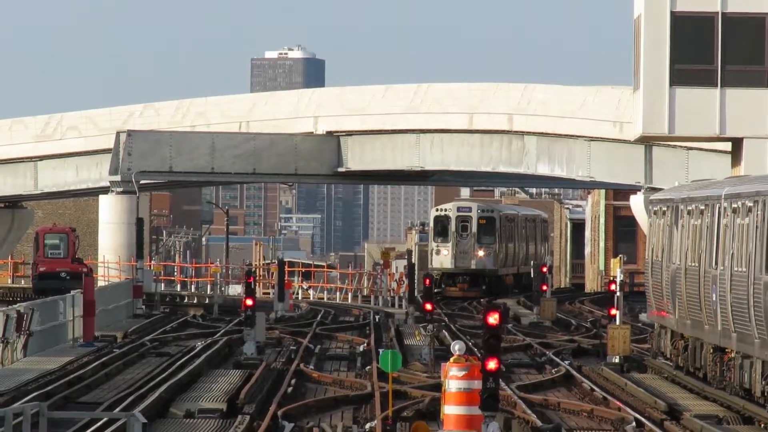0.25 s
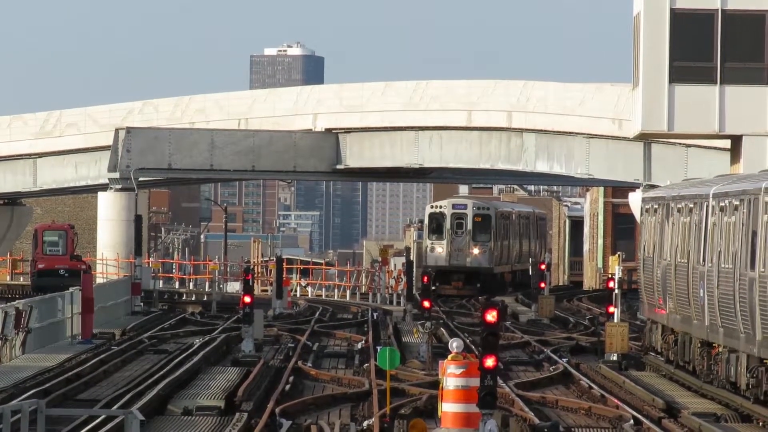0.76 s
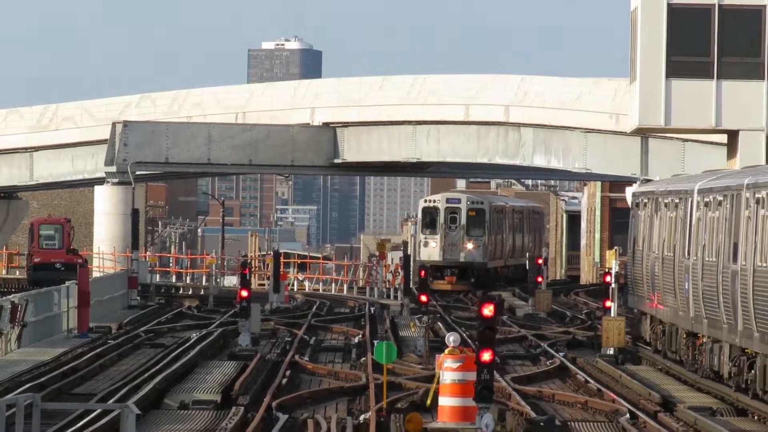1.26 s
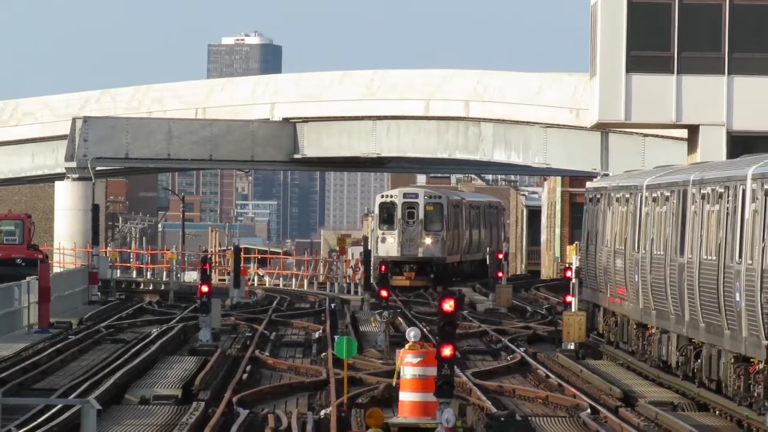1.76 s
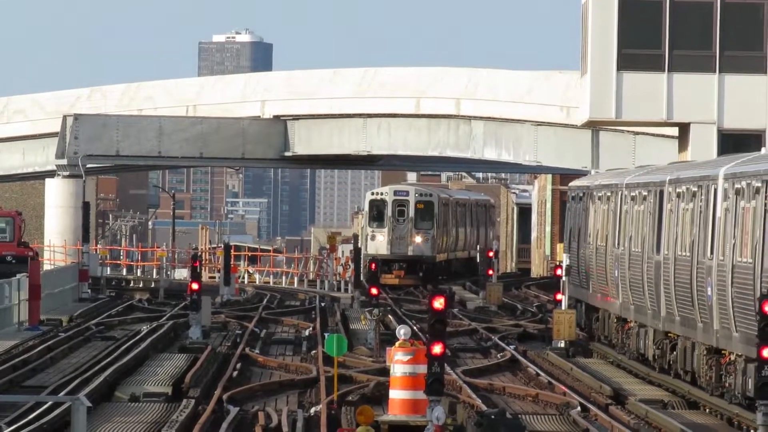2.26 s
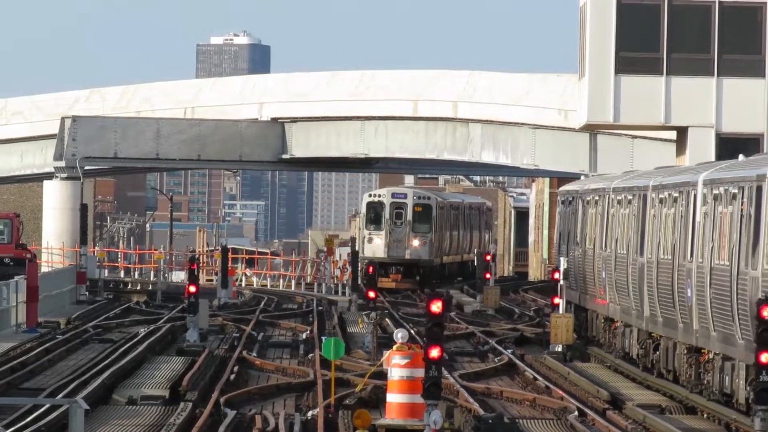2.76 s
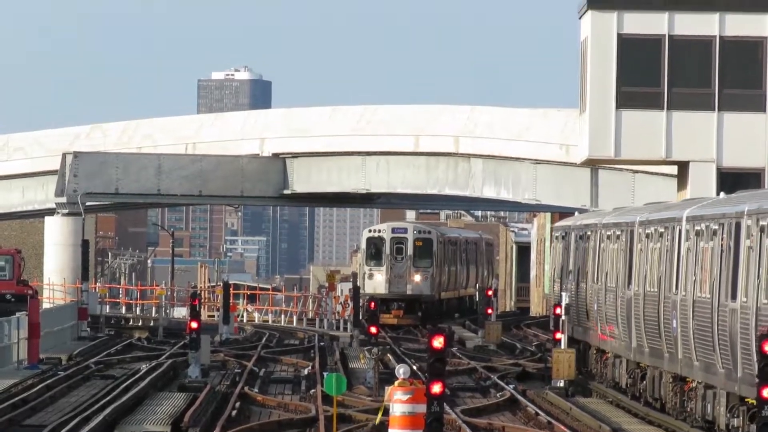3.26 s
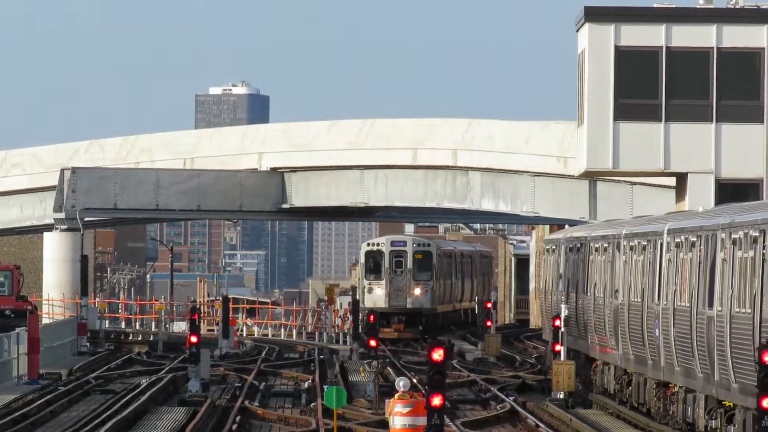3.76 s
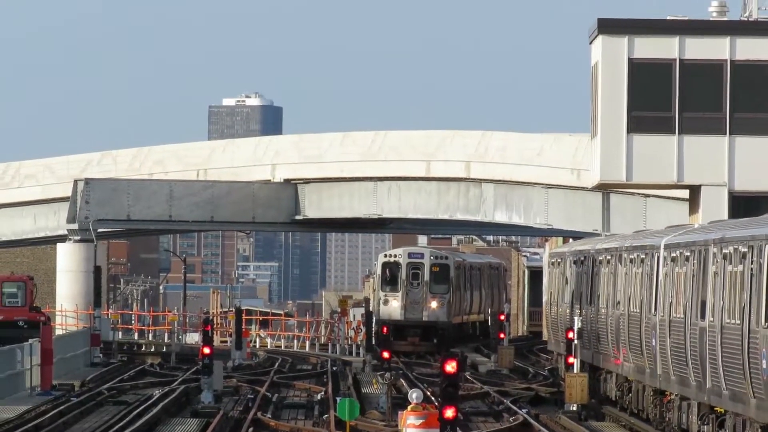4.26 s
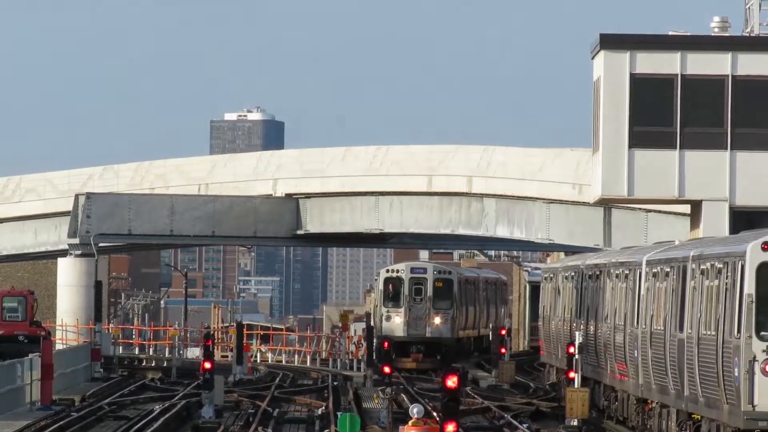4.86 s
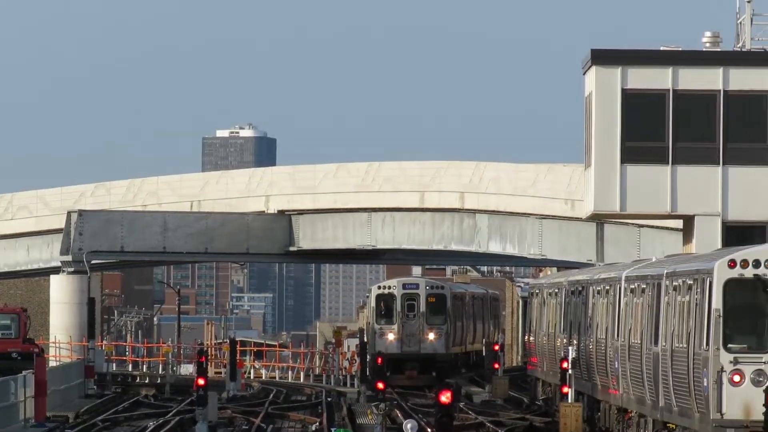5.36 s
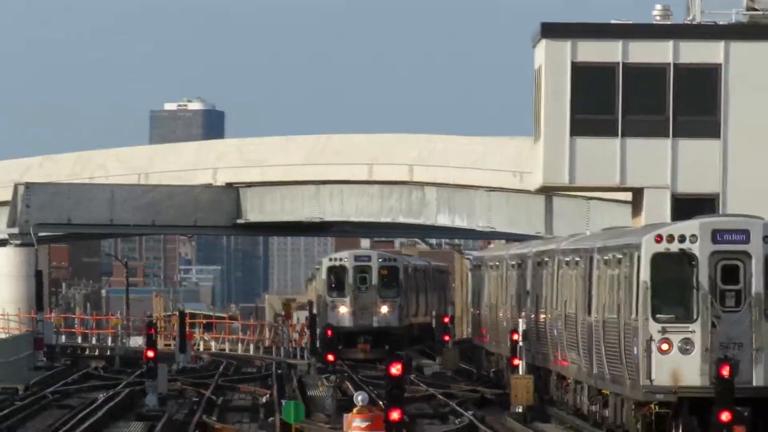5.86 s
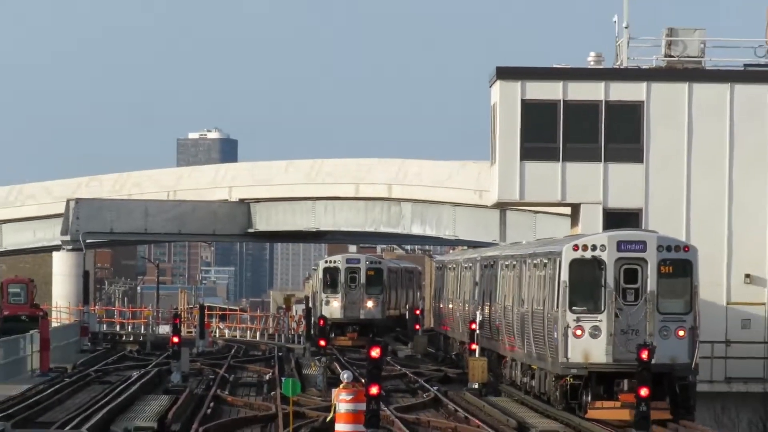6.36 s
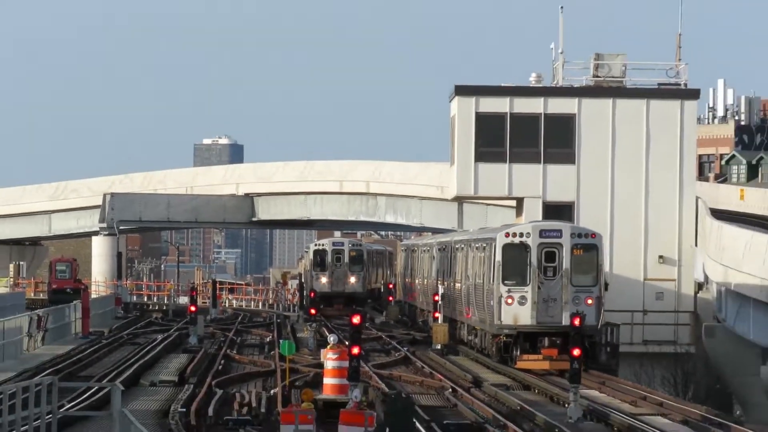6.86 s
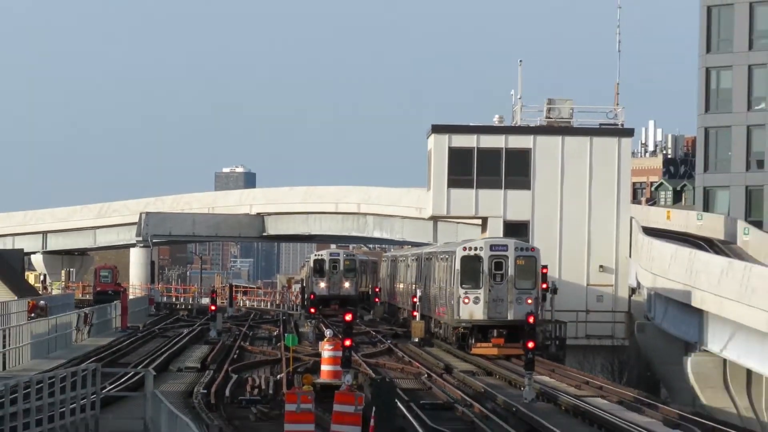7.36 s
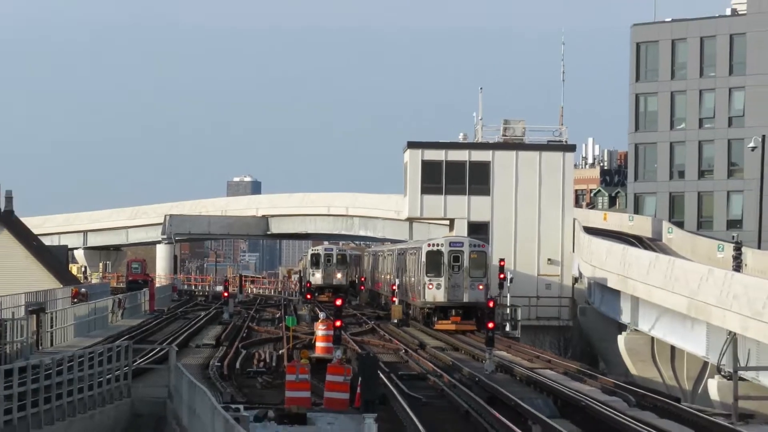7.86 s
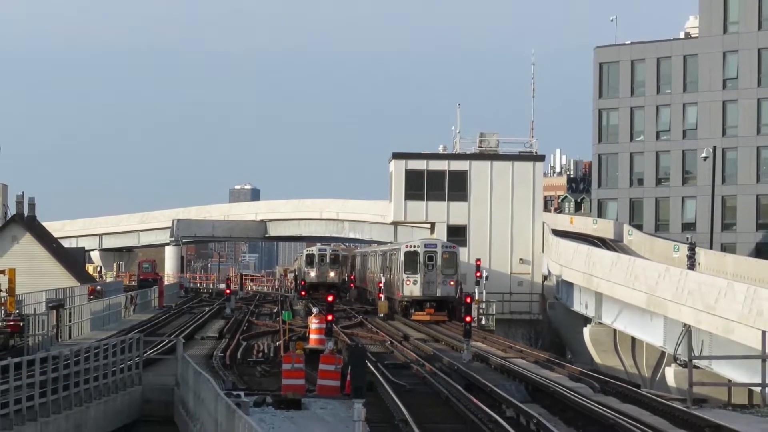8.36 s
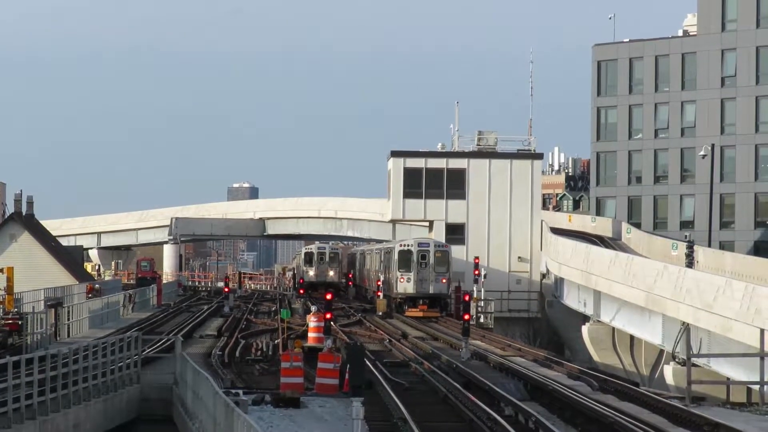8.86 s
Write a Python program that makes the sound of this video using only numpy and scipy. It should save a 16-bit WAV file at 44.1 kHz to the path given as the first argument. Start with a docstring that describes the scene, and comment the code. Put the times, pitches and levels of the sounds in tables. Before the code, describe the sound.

Stereo microphone in open air near a viaduct: quiet wheel rumble grows into a mid-heavy steel roar. Low wind gusts thicken over the first two and a half seconds, then a wind filter removes them, leaving a thinner, narrow sound. Rail joints clack irregularly, girders ring and thump, and small wavering squeals appear, clustering just after six seconds and near the end as the rolling continues.

```python
"""Electric trains on a viaduct junction

Trains roll slowly over a steel deck, heard in stereo: bands of noise rumble and roar, resonant noise rings
in wheels and girders, wavering tones squeal, and short bursts with a tick clack over rail gaps.
Gusts of low noise buffet each microphone until a wind filter cuts the bass and narrows the sound almost
to mono; later the filter eases."""
import sys
import numpy as np
from scipy import signal
from scipy.fft import rfft, irfft, next_fast_len
from scipy.io import wavfile

SR = 44100
rng = np.random.default_rng(int(sys.argv[2]) if len(sys.argv) > 2 else 0)


def bounce(signal):
    """Save signal as a 16-bit WAV file at the path given by the first command-line argument."""
    frames = np.transpose(np.atleast_2d(signal))
    limited = np.clip(frames, -1, 1)
    pcm = np.round(limited * 32767).astype(np.int16)
    wavfile.write(sys.argv[1], SR, pcm)


N = 402191
SIZE = next_fast_len(N)
HZ = np.maximum(np.fft.rfftfreq(SIZE, 1 / SR), 1)
T = np.arange(N) / SR
SHUTS_S, EASES_S = 2.68, 6.15  # wind filter
BOOM_TOP_HZ = 600

# rail roar: at_s, level_db
ROAR_LEVEL = [(0, -29), (.17, -26), (.45, -24.5), (.8, -20), (1.8, -19), (2.2, -22), (2.52, -31.5),
              (2.85, -27), (3.1, -24.5), (3.45, -20.5), (3.85, -17), (4.5, -17.5), (5.2, -19),
              (5.65, -16.5), (6.4, -17.5), (7.15, -17), (7.5, -18.5), (8.1, -18), (8.5, -16.5), (9.12, -18)]
# treble: at_s, wheel_db and hiss_db (over the rolling spectrum), rim_db (over the roar)
TREBLE_LEVELS = [(0, 3.5, 0.5, -43), (.55, 3.5, 1.5, -26), (1.3, 1.7, 0.8, -39), (2.1, -0.5, -1, -30),
                 (2.5, 2, 0, -32), (3.65, 1.5, -0.5, -31), (4.1, 0, -1, -27.5), (6.2, -0.5, 0.7, -28),
                 (7.3, -3, -2.5, -26.5), (8.1, 0, -3, -29.5), (8.6, -1.5, -1.5, -26), (9.12, -2.5, 1, -24)]


def undb(db):
    """Amplitude ratio of a level in dB."""
    return 10 ** (np.asarray(db) / 20)


def unit(x):
    """Scale to an RMS of 1."""
    return x / np.sqrt(np.mean(x ** 2))


def on_hz(table, hz):
    """A (Hz, dB) table read on a log-frequency axis."""
    table_hz, table_db = np.transpose(table)
    return np.interp(np.log(hz), np.log(table_hz), table_db)


def on_time(table):
    """Each column after the first, joined by straight lines over time."""
    s, *columns = np.transpose(table)
    return [np.interp(T, s, column) for column in columns]


def noise(gain):
    """Fresh noise with the given gain per frequency."""
    return irfft(rfft(rng.standard_normal(SIZE)) * gain, SIZE)[:N]


def walk(rate_hz):
    """Random levels joined by straight lines, spread near 1."""
    knots_s = np.arange(0, N / SR + 1, 1 / rate_hz)
    return 1.114 * np.interp(T, knots_s, rng.standard_normal(len(knots_s)))


def rolling():
    """Deck, rail and wheel noise in half-octave steps, as mid and side; the treble clatters together."""
    # rolling spectrum: pitch_hz, relative density_db per Hz
    spectrum = [(15, -89.5), (48, -36.5), (80, -19.5), (133, -20), (240, -10), (293, -4), (389, -2.5),
                (736, -5), (1250, -14.5), (1660, -25), (2260, -29), (3900, -35.5), (4400, -43), (6300, -55),
                (9000, -63)]
    # extra while the filter is open: pitch_hz, lift_db
    open_lift = [(30, 16.5), (60, 2), (120, 1.5), (200, 0.5), (300, -1.5), (450, 2), (700, -3), (1200, 5),
                 (1700, 0.5), (2400, 3)]
    # stereo width: pitch_hz, side_minus_mid_db
    width = [(60, -66.5), (160, -52), (250, -21.5), (400, -12), (1040, -6.5), (1670, -8.5), (2680, -17),
             (4310, -16), (6000, -1.5), (9000, 6.5)]
    # narrowing under mono_hz: at_s, side_db
    narrowing = [(2.66, -16), (2.68, -45.5), (4.4, -39.5), (6.12, -29), (6.3, -21), (6.8, -15)]
    # deck rumble over the roar, before the filter's bass lift: at_s, level_db
    deck = [(0, -5), (.5, -6.5), (.68, -1.5), (2.2, 0), (2.45, 6.5), (2.66, 1.5), (2.72, 6), (3.1, 0),
            (3.4, 1.5), (6.1, -1), (6.5, 2), (7.25, -2.5), (7.9, 2), (8.8, -3), (9.12, 3.5)]
    mono_hz = 1500
    bass_open_db, bass_eased_db = 16, 3
    lumps_db = 1.5  # extra unevenness below BOOM_TOP_HZ while the filter is open

    roar_db, is_open = on_time(ROAR_LEVEL)[0], filter_open()
    eased = np.clip((T - EASES_S) * 20, 0, 1)
    deck_db = on_time(deck)[0] + bass_open_db * is_open + bass_eased_db * eased
    wheel_db, hiss_db, _ = on_time(TREBLE_LEVELS)
    shape = undb(on_hz(spectrum, HZ))
    roar_range = (HZ > 450) & (HZ < 1400)
    scale = np.sqrt(2 * np.sum(shape[roar_range] ** 2) / SIZE)  # RMS of the roar range
    narrow_db, clatter = on_time(narrowing)[0], walk(7.7)
    surge_db = surges()
    mid = side = 0
    for octave in np.arange(0, 9, .5):
        hz = 250 / 8 * 2 ** octave
        # neighbours add up to even power
        band = shape * np.cos(np.pi * np.clip(np.log2(HZ / hz), -.5, .5))
        deck_share = np.clip(np.log2(300 / hz) * 2, 0, 1)
        wheel_share = np.clip(np.log2(hz / 1200) * 2, 0, 1) * (hz < 5000)
        db = roar_db + deck_share * deck_db + wheel_share * wheel_db + (hz >= 5000) * hiss_db
        db = db + is_open * on_hz(open_lift, hz) * (hz < 2400)
        db = db + 1.2 * min(hz / 1500, 1) * clatter
        uneven_db = 1.0 + 0.7 * (240 < hz < 1500) + lumps_db * is_open * (hz < BOOM_TOP_HZ)
        db = db + uneven_db * walk(10) + surge_db[int(hz > BOOM_TOP_HZ)]
        side_db = db + on_hz(width, hz) + narrow_db * (hz < mono_hz)
        mid = mid + undb(db) * noise(band)
        side = side + undb(side_db) * noise(band)
    return np.array([mid, side]) / scale


def rims():
    """Wheel rims, kept ringing by the rough rail, and girders ring with the roar."""
    # rim resonances: pitch_hz, width_hz, level_db (over the rim drive)
    rim_modes = [(2300, 78, -4.5), (3720, 50, -10), (3160, 430, -3), (3618, 57, -7.5), (3830, 180, -7),
                 (4760, 360, -9), (5600, 300, -18.5)]
    # girder and rail resonances: pitch_hz, width_hz, level_db (over the surging roar)
    girder_modes = [(107, 28, -29.5), (312.8, 49, -9), (393, 73, -7.5), (555.4, 34, -17.5), (727, 90, -10),
                    (1124, 170, -15.5), (1978, 140, -31.5), (2233, 220, -27.5), (2440, 98, -37.5)]
    roar_db = on_time(ROAR_LEVEL)[0]
    wheels = ringing(rim_modes, roar_db + on_time(TREBLE_LEVELS)[-1], swell_db=2.5, rate_hz=14)
    girders = ringing(girder_modes, roar_db + surges()[0], swell_db=3, rate_hz=11)
    return wheels, girders


def ringing(modes, drive_db, swell_db, rate_hz):
    """Noise in each resonance, swelling on its own around a common drive."""
    out = 0
    for hz, width_hz, db in modes:
        resonance = 1 / (1 + ((HZ - hz) / width_hz * 2) ** 2)
        level_db = drive_db + db + swell_db * walk(rate_hz)
        out = out + undb(level_db) * unit(noise(resonance))
    return out


def squeals():
    """Flange squeals and rail singing: tones that start fast, waver, fray and die away, as mid and side."""
    # start_s, length_s, start_hz, end_hz, level_db, side_minus_mid_db, pitch_raggedness_hz
    tones = [(.455, .04, 5350, 5350, -55, 3, 10), (.54, .05, 3790, 3830, -48, -8, 20),
             (.6, .028, 3790, 3800, -46, -8, 20), (.612, .2, 4733, 4733, -48.5, 3, 0),
             (1.9, .12, 4733, 4733, -51, 1, 0), (2.96, .12, 4733, 4733, -54, -3, 0),
             (3.1, .15, 4733, 4733, -53, -3, 0), (.684, .06, 3860, 3950, -46, -8, 30),
             (.742, .025, 3960, 3970, -45, -8, 20), (3.533, .09, 4740, 4733, -51, -6, 5),
             (4.33, .11, 4750, 4750, -52, -3, 40), (6.05, .07, 4760, 4760, -51, -3, 40),
             (6.077, .07, 3580, 3560, -45, -8, 30), (6.099, .17, 3060, 3080, -44, -7, 40),
             (6.101, .15, 2230, 2250, -42, -9, 40), (6.18, .08, 3540, 3600, -48, -6, 30),
             (6.342, .07, 3590, 3580, -43, -9, 30), (6.502, .06, 3580, 3530, -45, -9, 30),
             (6.335, .32, 4900, 4800, -50, 0, 90), (6.878, .03, 2300, 2000, -37, -16, 90),
             (6.905, .07, 1850, 1480, -35, -16, 150), (8.28, .14, 2470, 2500, -44, -13, 60),
             (8.46, .13, 2530, 2540, -42, -9, 30), (8.602, .09, 2560, 2600, -42, -9, 30),
             (8.362, .07, 3760, 3740, -45, -13, 30), (8.42, .13, 3700, 3660, -45, -13, 25),
             (8.685, .07, 3770, 3720, -45, -6, 30), (8.857, .24, 3780, 3740, -45, -7, 45),
             (8.96, .14, 1200, 1190, -31, -20, 15), (9.0, .1, 2530, 2520, -43, -9, 40),
             (8.494, .12, 4740, 4780, -49, -1, 50), (8.77, .13, 4880, 4760, -49, -8, 90),
             (8.8, .13, 5550, 5550, -53, -3, 100), (8.99, .07, 5400, 5500, -51, 2, 110),
             (8.95, .16, 4800, 4850, -51, -5, 120)]
    out = np.zeros((2, N))
    waver, flutter, fray = walk(18), walk(70), walk(160)
    for s, length_s, hz0, hz1, db, side_db, ragged_hz in tones:
        span = slice(int(s * SR), int((s + length_s) * SR))
        u = ((T[span] - s) / length_s).clip(0, 1)
        hz = hz0 + (hz1 - hz0) * u + 5.5 * waver[span] + ragged_hz * fray[span]
        phase = 2 * np.pi * np.cumsum(hz) / SR
        level_db = db + 1.5 * waver[span] + (1.5 + ragged_hz / 40) * flutter[span]
        envelope = np.minimum(u * length_s / .01, 1) * (1 - u ** 2.3)  # 10 ms attack
        mid_side = np.array([np.sin(phase), undb(side_db) * np.cos(phase)])
        out[:, span] += np.sqrt(2) * undb(level_db) * envelope * mid_side
    return out


def clacks():
    """Wheels over rail gaps: a sharp steel tick and a burst smeared by the girders, plus random small knocks."""
    # blows: start_s, level_db (before burst_db and tick_db), brightness_db
    blows = [(0.1181, -28, -3), (0.3894, -38, 2), (0.6594, -25, 0), (0.7761, -43, 2), (0.9084, -24, -9),
             (1.2411, -37, -4), (2.1999, -29, 2), (2.3052, -30, -7), (2.4329, -34, -9), (2.6194, -37, -20),
             (2.6938, -35, -16), (2.8194, -36, -6), (3.0121, -32, -15), (3.0919, -30.5, -4),
             (3.2565, -27.5, -8), (3.3752, -30, 0), (3.8594, -36, -5), (4.116, -35, -4), (4.2293, -22, -9),
             (4.3056, -35, -2), (4.4505, -21.5, 1), (4.7237, -24, -13), (4.9402, -29, -7), (5.1494, -31, 4),
             (5.5628, -50, -7), (5.691, -28, -13), (5.7932, -21, -10), (6.108, -25, -9), (6.2342, -33, -5),
             (6.4288, -24, 3), (6.8834, -31, -9), (7.3994, -27, -12), (7.6294, -36, -3)]
    # burst spectrum: pitch_hz, level_db
    spectrum = [(150, -45), (400, -5), (1000, -7.5), (2200, -0.5), (2900, -8), (3600, -3), (4400, -14.5),
                (6000, -20.5), (9000, -31.5)]
    burst_db = 6.5
    tick_hz, tick_db, tick_s = 3705, 11, 0.0018
    knocks_per_s, knock_db, knock_spread_db = 20, -20.5, 4  # levels over the roar

    shape = undb(on_hz(spectrum, HZ))
    dull = noise(shape * (HZ < 5000))
    bright = noise(shape * (HZ >= 5000))
    roar_db = on_time(ROAR_LEVEL)[0]
    chance = rng.random((int(knocks_per_s * N / SR), 2)) * [(N - 1) / SR, 1]
    knocks = []
    for s, p in chance:
        db = roar_db[int(s * SR)] + knock_db - knock_spread_db * np.log(1 - .9 * p)
        knocks.append((s, db, -4.0))
    out = np.zeros(N)
    for s, db, bright_db in blows + knocks:
        span = slice(int(s * SR), int((s + .15) * SR))
        u = (T[span] - s).clip(0)
        burst = np.exp(-u / 0.016) * dull[span] + undb(bright_db) * np.exp(-u / 0.011) * bright[span]
        burst = (1 - np.exp(-u / 0.0013)) * burst
        pitch_hz = tick_hz * (0.94 + 0.11 * rng.random())
        tick = u / tick_s * np.exp(-u / tick_s * 2) * np.sin(2 * np.pi * pitch_hz * u)
        out[span] += undb(db) * (undb(burst_db) * burst + undb(tick_db) * tick)
    return out


def wind():
    """Turbulence, unrelated on the two microphones, until the filter shuts."""
    # gusts with steady slopes in dB: peak_s, peak_db
    gusts = [(.92, -28.5), (1.16, -23.5), (1.2, -19.5), (1.5, -32), (1.62, -19), (1.78, -20), (1.92, -18.5),
             (2.2, -14), (2.34, -13.5), (2.43, -14), (2.58, -19)]
    # wind building up: at_s, level_db (on each microphone)
    breeze = [(0, -69), (.5, -56), (.85, -38.5), (1.4, -29.5), (2.1, -25), (2.4, -18), (2.66, -23.5)]
    # turbulence spectrum: pitch_hz, relative density_db per Hz
    buffet = [(18, -76), (30, -44.5), (214, -1.5), (420, 0), (520, -14.5), (595, -8), (841, -22.5),
              (944, -21), (3000, -71), (3900, -92), (6600, -120)]
    rise_db_per_s, fall_db_per_s = 191.5, 160.5

    levels_db = on_time(breeze)
    for s, db in gusts:
        levels_db.append(db - np.maximum(rise_db_per_s * (s - T), fall_db_per_s * (T - s)))
    gust = undb(np.max(levels_db, axis=0)) * filter_open()
    shape = undb(on_hz(buffet, HZ))
    return np.array([gust * undb(3.5 * walk(21.94)) * unit(noise(shape)) for _ in range(2)])


def filter_open():
    """1 until the wind filter shuts, fading to 0 within 12 ms."""
    return np.clip((SHUTS_S - T) / .012 , 0, 1)


def surges():
    """Bell-shaped lifts in dB as wheelsets thump over the points, for the boom and the roar above it."""
    # peak_s, boom_lift_db, roar_lift_db
    thumps = [(0.16, 3.5, 2.3), (0.43, 3.5, 1.5), (0.92, 1.5, 2), (1.17, 2, 1), (1.46, 3, 0), (1.63, 2, -2),
              (1.87, 4.5, -3), (2.21, 3.5, 1), (2.43, 3, -3), (2.56, 2.5, -2), (3.26, 0.5, -2),
              (3.66, 2.5, 0.5), (4.69, 2.2, 3.3), (4.95, 2.5, 3.5), (5.15, 3.5, 1.5), (5.58, 0, 4),
              (5.7, -1, 2.7), (6.18, 4.5, 1), (6.45, 2, -0.5), (6.65, 3.5, 1), (6.96, 2.6, 2),
              (7.16, 2.5, -2.2), (7.43, 3.5, 3.5), (7.55, 3.5, 1.5), (7.77, 2.5, 2), (8.62, 3, 2.5),
              (8.72, 2, 0)]
    surge_s = 0.025
    out = np.zeros((2, N))
    for s, boom_db, roar_db in thumps:
        span = slice(int(max(s - 4 * surge_s, 0) * SR), int((s + 4 * surge_s) * SR))
        bell = np.exp(-.5 * ((T[span] - s) / surge_s) ** 2)
        out[:, span] += np.array([[boom_db], [roar_db]]) * bell
    return out


def scene():
    """Mix all sources; mid and side become left and right."""
    mid, side = rolling() + squeals()
    wheels, girders = rims()
    steel = wheels + clacks()
    # the two microphones hear the ringing steel one sample apart
    lagged = np.array([steel, np.roll(steel, 1)])
    return mid + girders + side * np.array([[1], [-1]]) + lagged + wind()


def record(dry):
    """Lower by 1 dB, round the loudest peaks smoothly and cut the top."""
    ceiling, top_hz = .97, 9050
    loud = dry * undb(-1)
    held = loud / (1 + (loud / ceiling) ** 4) ** .25
    low_pass = signal.ellip(12, .2, 60, top_hz, fs=SR, output="sos")
    return signal.sosfilt(low_pass, held)


dry = scene()
out = record(dry)
bounce(out)
```